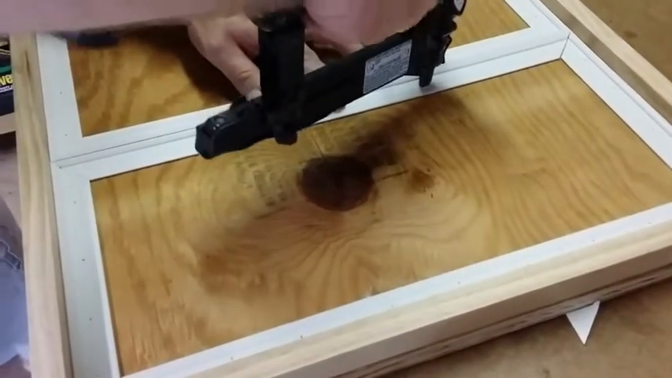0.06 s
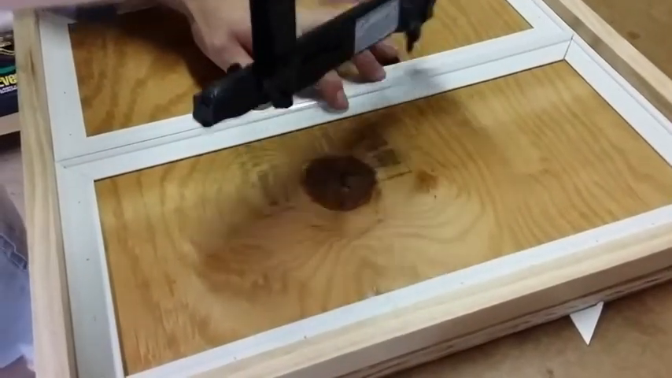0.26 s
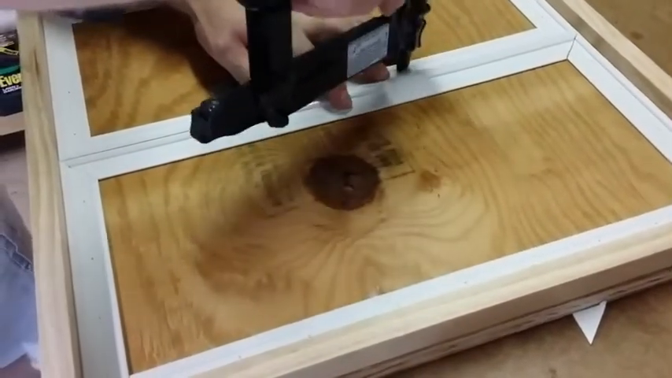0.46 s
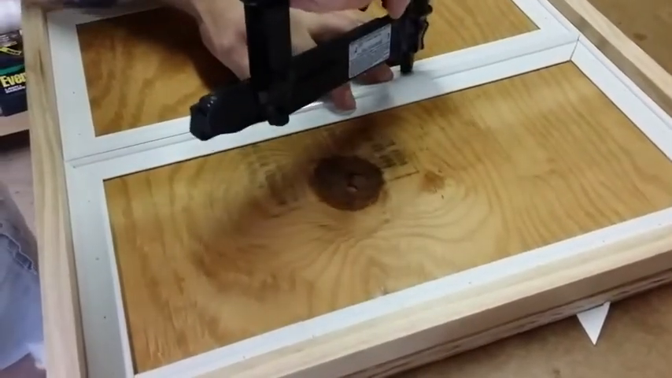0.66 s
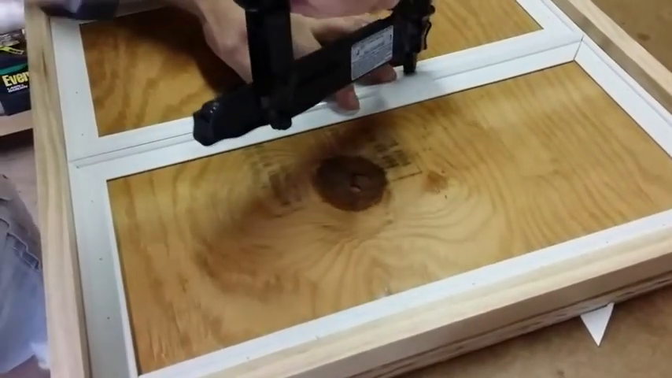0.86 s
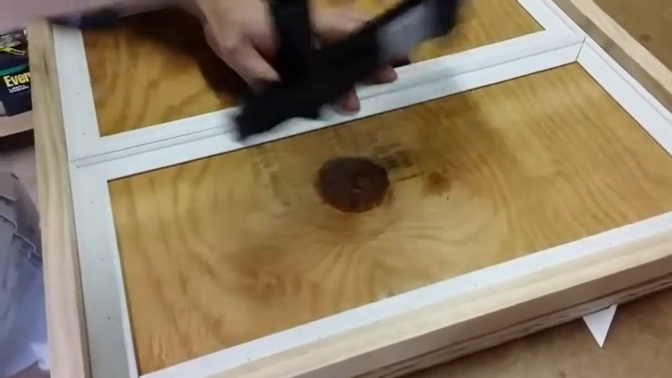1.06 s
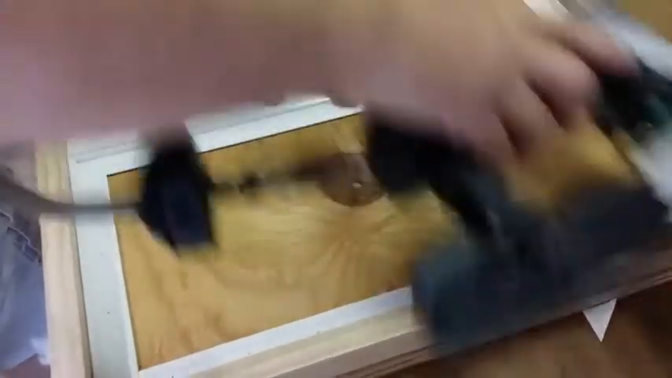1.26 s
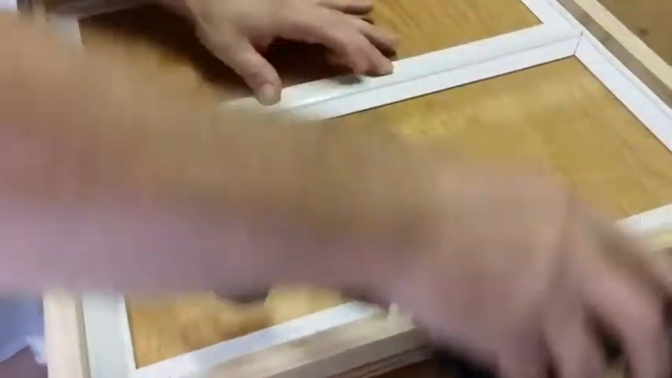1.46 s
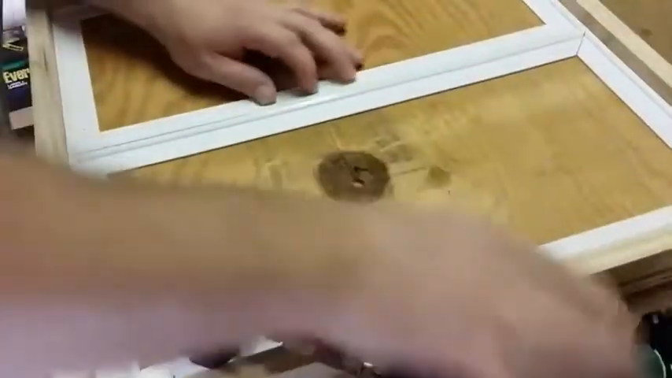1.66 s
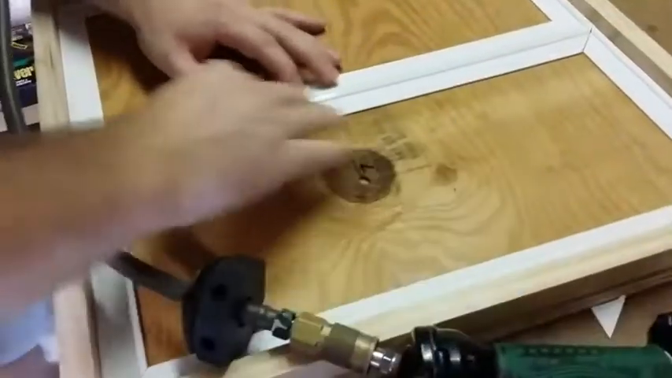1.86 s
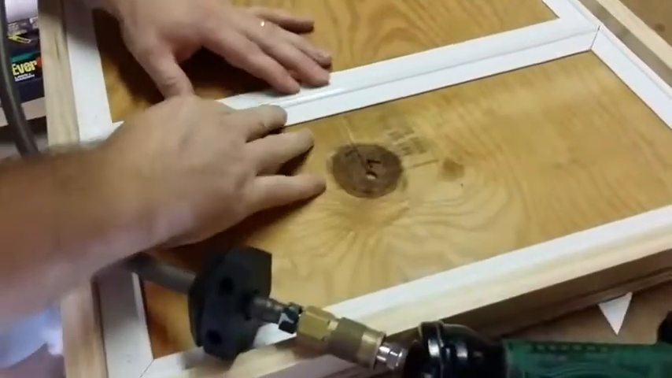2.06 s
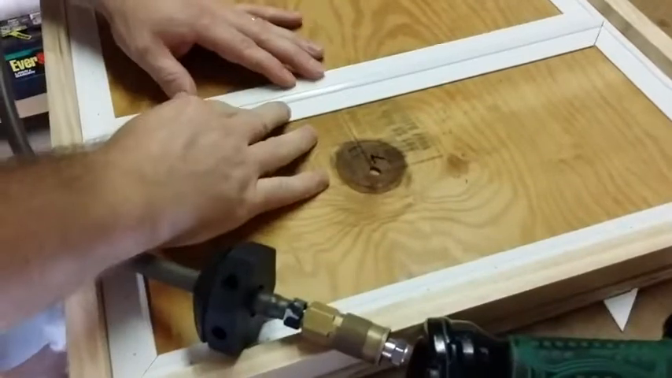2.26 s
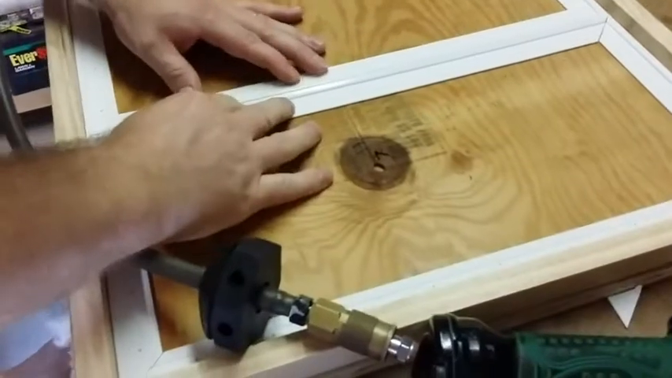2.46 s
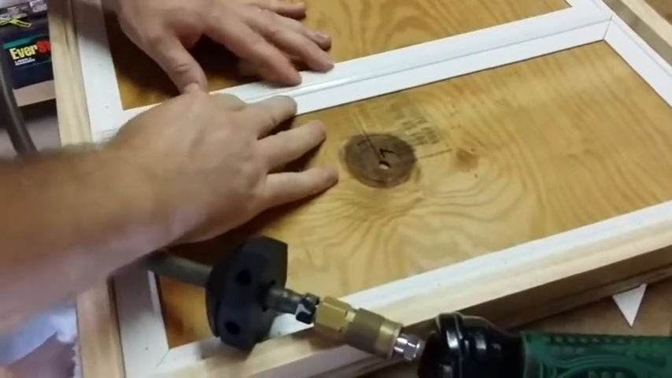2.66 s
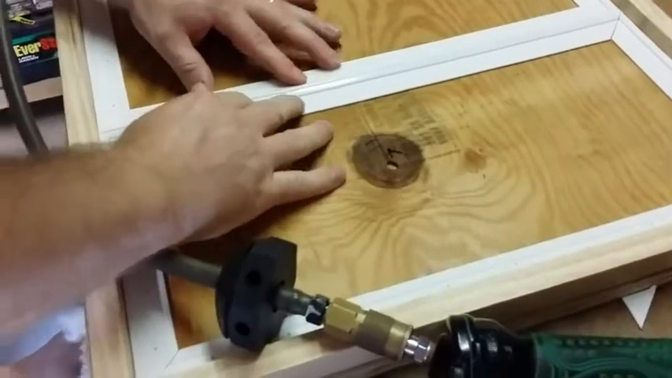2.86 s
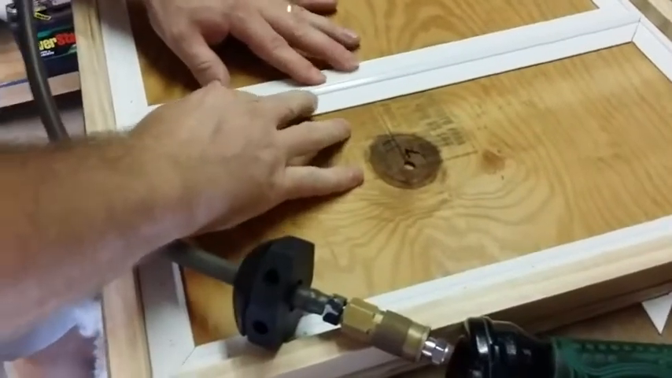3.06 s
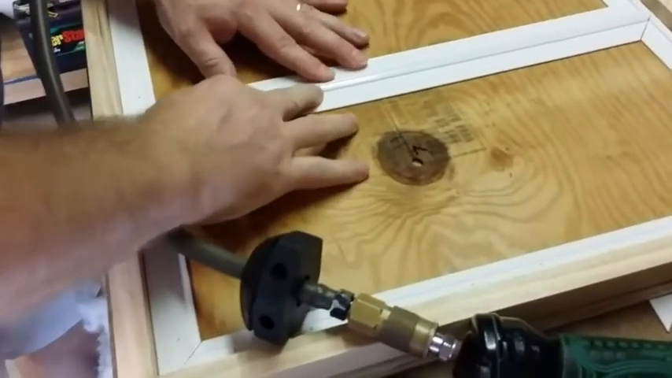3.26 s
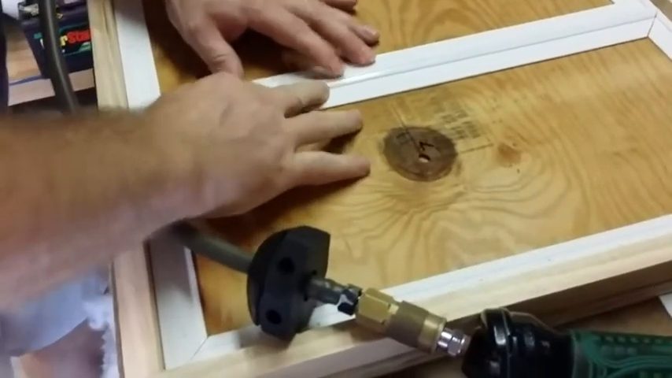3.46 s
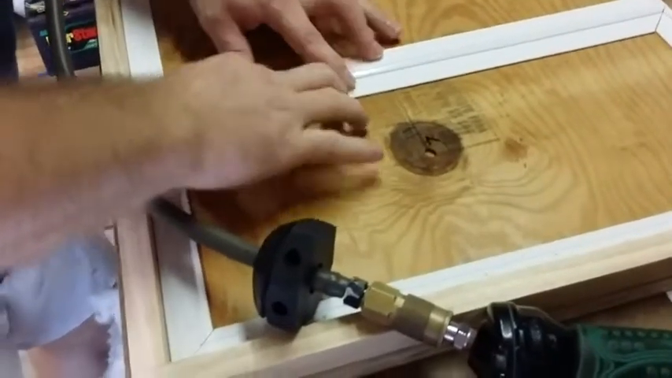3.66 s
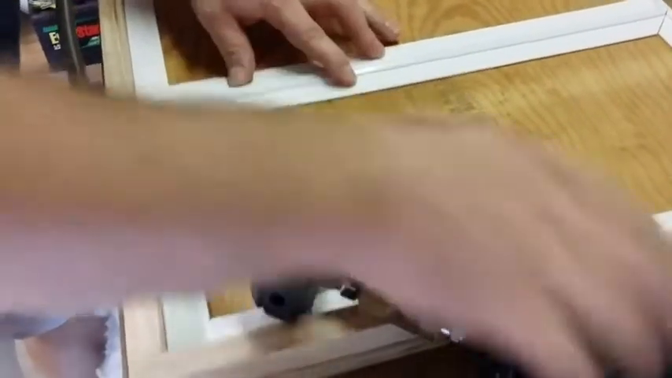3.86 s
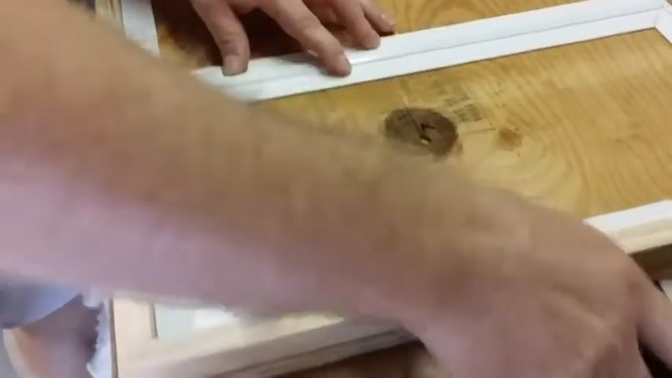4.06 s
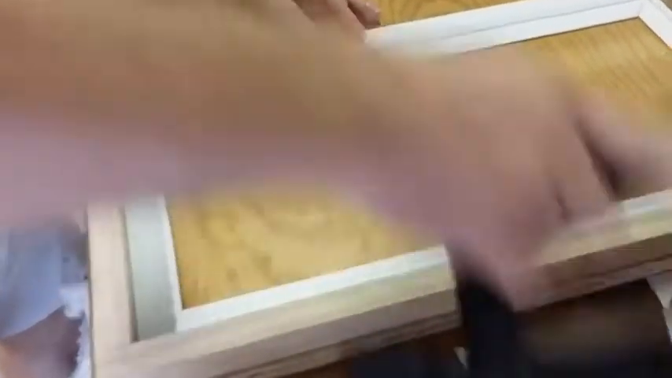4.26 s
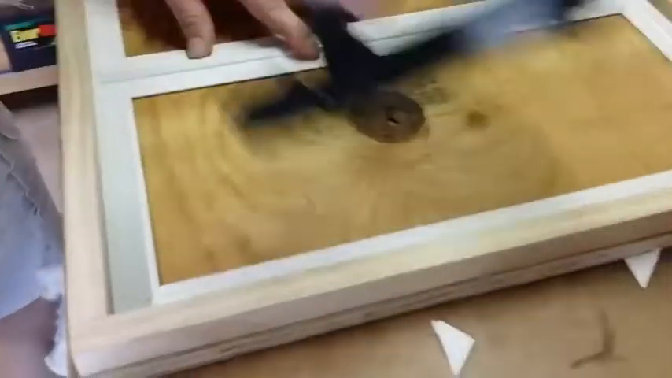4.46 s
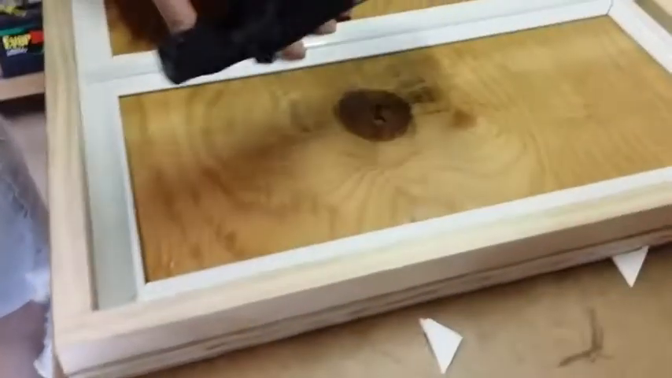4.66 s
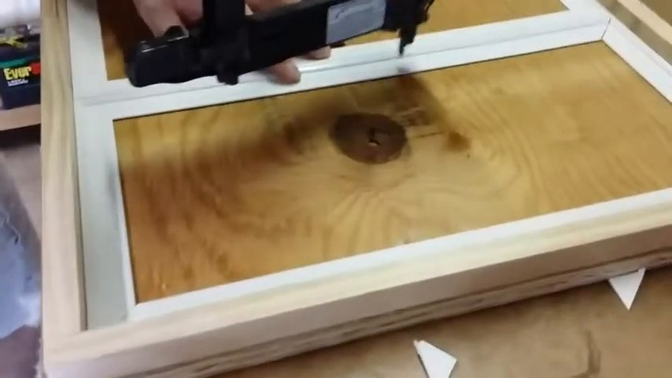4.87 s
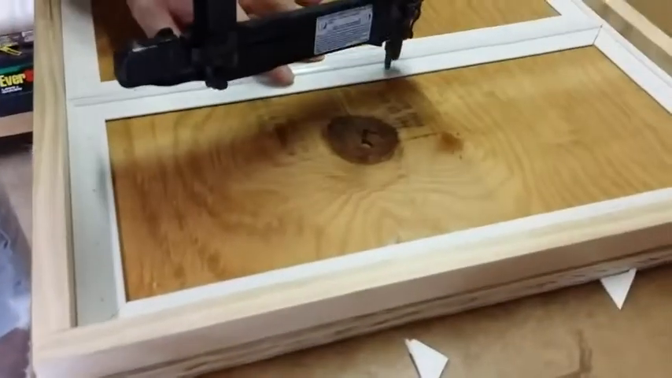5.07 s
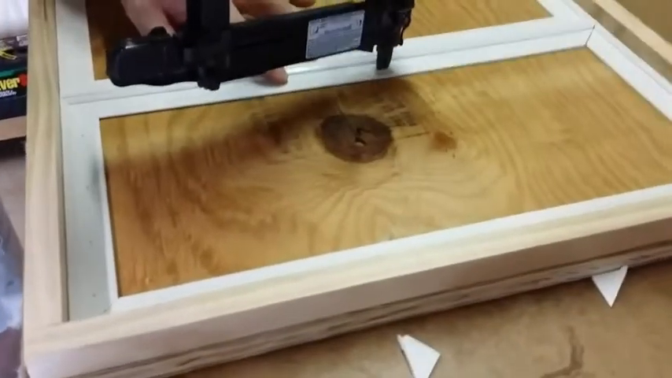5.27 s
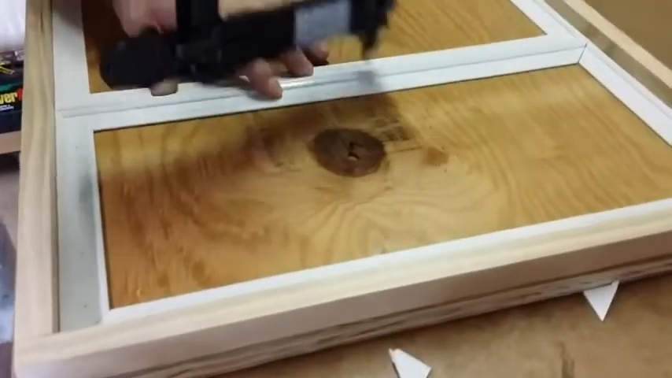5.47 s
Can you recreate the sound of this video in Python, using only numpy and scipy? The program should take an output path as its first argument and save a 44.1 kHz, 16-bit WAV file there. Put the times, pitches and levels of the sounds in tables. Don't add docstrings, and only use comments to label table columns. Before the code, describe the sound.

In a small workshop, a pneumatic stapler fires two sharp cracks into wood within the first second, each followed by a short air puff. The tool is laid down with a heavy wooden clunk and small bumps. A rapidly thumping, clattering compressor swells up behind, then metallic ticks and a nose knock precede a last, loudest shot. Close phone microphone, stereo, with automatic gain pumping.

```python
import sys
import numpy as np
from scipy import signal
from scipy.fft import rfft, irfft
from scipy.io import wavfile

SR = 44100
rng = np.random.default_rng(int(sys.argv[2]) if len(sys.argv) > 2 else 0)


def attenuation_scalar(level_db):
    decades = np.asarray(level_db, float) / 20
    return 10 ** decades


def put_to_file(sound):
    columns = np.atleast_2d(sound).T
    safe = np.clip(columns, -1, 1)
    whole_steps = np.round(safe * 32767)
    wavfile.write(sys.argv[1], SR, whole_steps.astype(np.int16))


N = 242550
SHAFT_HZ = 29.882

# start in seconds, peak in dB, left minus right in dB, bench boom in dB.
SHOTS = [
    (0.0723, -5.5, 3.5, -18),
    (0.8811, -6, 2.5, -15),
    (5.2997, -3, 4, -4.5),
]
# start in seconds, peak in dB, piston knock in dB,
# venting time in seconds, thud of the piston seating in dB.
PUFFS = [
    (0.1486, -6.5, -17.5, 0.029, -21),
    (0.9776, -5, -15.5, 0.027, -14),
    (5.384, -5.5, -18.5, 0.02, -14),
]
# frequency in Hz, likeness (1 = the same).
NEAR = [(60, 0.88), (130, 1), (290, 0.52), (640, 0.61), (1410, -0.046), (3100, 0.3), (6820, -0.094),
        (15000, -0.03)]


def along(hz, table):
    f, v = np.transpose(table)
    return np.interp(np.log(np.maximum(hz, 1)), np.log(f), v)


def colour(x, table):
    c = irfft(along(np.fft.rfftfreq(4096, 1 / SR), table) * np.log(10) / 20)
    c[1:2048] *= 2
    c[2049:] = 0
    h = irfft(np.exp(rfft(c)))[:2048]
    h = h / np.sqrt(np.sum(h ** 2))
    h = h.reshape((1,) * (x.ndim - 1) + (-1,))
    return signal.fftconvolve(x, h, axes=-1)[..., :x.shape[-1]]


def level(x, db):
    return x * attenuation_scalar(db) / np.sqrt(np.mean(x ** 2))


def pair(a, b, table):
    alike = np.clip(along(np.fft.rfftfreq(len(a), 1 / SR), table), 0, 1)
    mid = rfft(a) * np.sqrt((1 + alike) / 2)
    side = rfft(b) * np.sqrt((1 - alike) / 2)
    return irfft(np.array([mid + side, mid - side]), len(a))


def shape(s, rise, hold, t60):
    out, start = np.zeros(N), int(s * SR)
    t = np.arange(min(N - start, int((hold + 1.5 * t60) * SR))) / SR
    fall = attenuation_scalar(-60 * np.maximum(t - hold, 0) / t60)
    out[start:start + len(t)] = np.clip(t / max(rise, 1e-4), 0, 1) * fall
    return out


def gun():
    # frequency in Hz, level in dB per Hz.
    crack_colour = [(88, -22), (150, -12), (339, -5.5), (752, -7.5), (896, -5), (1050, -2), (1540, -4.5),
                    (2150, -1), (3050, -5), (3360, -9), (5560, -11.5), (6130, -10), (15600, -29)]
    air_colour = [(180, -35), (300, -4), (501, -19), (553, -17), (795, -14), (1790, -36), (2330, -4.5),
                  (3890, -7), (6710, 0.5), (13900, 1), (15600, -1.5)]
    piston_colour = [(88, -41), (150, -4.5), (1160, -1), (1510, -3.5), (1800, -3), (2160, -9), (2470, -2),
                     (3730, -10), (4000, -6.5), (5200, -14.5), (8800, -120)]
    crack, air, piston = np.zeros((3, 2, N))
    crack_noise, air_noise, piston_noise = [pair(*rng.standard_normal((2, N)), NEAR) for _ in range(3)]
    for s, db, pan_db, _ in SHOTS:
        lean = attenuation_scalar(db + np.array([[pan_db], [-pan_db]]) / 2)
        crack += lean * crack_noise * attenuation_scalar(-7) * shape(s, 0.00011, 0.013, 0.17)
        crack[:, int(s * SR)] += attenuation_scalar(5) * lean[:, 0]
        air += attenuation_scalar(db - 45) * air_noise * shape(s - 0.005, 0.001, 0.0036, 0.02)
        air += attenuation_scalar(db - 13.8) * air_noise * shape(s, 0.0024, 0.019, 0.24)
    for s, db, knock_db, vent_s, _ in PUFFS:
        air += attenuation_scalar(db - 8.5) * air_noise * shape(s, 0.001, vent_s, 0.3)
        piston += attenuation_scalar(knock_db) * piston_noise * shape(s, 0.0003, 0.021, 0.034)
        piston[:, int(s * SR)] += attenuation_scalar(knock_db + 23)
    vent_side = attenuation_scalar(np.array([[-1.2], [1.2]]))
    dip = signal.iirnotch(3800, 9, SR)
    air = signal.lfilter(*dip, signal.lfilter(*dip, air))
    loud = colour(crack, crack_colour) + vent_side * colour(air, air_colour)
    return loud, colour(piston, piston_colour)


def blows():
    # start in seconds, low level in dB, clack in dB,
    # brightness in dB per octave.
    knocks = [(0.351, -47, -32.5, 8), (.452, -34.5, -56, -14), (.648, -29.5, -44.5, 0.5),
              (1.5799, -10, -10, 2.5), (1.603, -17.5, -28, -8), (1.633, -42, -30, -14),
              (1.666, -32, -50, -10), (1.728, -25, -37, 2.5), (1.74, -25, -55, -5.5),
              (1.789, -41, -46, -2.5), (1.816, -36, -68, -8), (1.899, -35, -52, 7), (1.912, -33, -51, -18),
              (2.004, -33, -63, -9)]
    ring_t60_s, boom_t60_s = 0.1, 0.07
    no_clack_db = -90
    rows = [(s, db, clack_db, ring_t60_s, tilt_db) for s, db, clack_db, tilt_db in knocks]
    for k in range(3):
        rows.append((5.153 + k * 0.0122, -4 - k * 5.2, -30 - k * 9, 0.095, -2.2))
    for s, _, _, boom_db in SHOTS:
        rows.append((s - 0.00094, boom_db, no_clack_db, boom_t60_s, -5.5))
    for s, _, knock_db, _, seat_db in PUFFS:
        rows.append((s, knock_db + 2.5, no_clack_db, boom_t60_s, -1.2))
        rows.append((s + 0.029, seat_db, no_clack_db, boom_t60_s, -5.5))
    return rows


def handling():
    # frequency in Hz, level in dB, share of the ring time.
    bench_modes = [(91, -14, 1.5), (112.5, -9, 1.1), (142.2, -3, 1.27), (198, 2.5, 0.69),
                   (256.6, 6.5, 0.34), (326, -0.5, 0.65), (434, -8.5, 0.68), (565, -10.5, 0.6),
                   (1014, -16, 2), (1265, -19, 0.63), (1760, -16, 0.36)]
    # frequency in Hz, level in dB per Hz.
    clack_colour = [(240, -29), (400, -4), (874, -1.5), (1430, -8), (1770, -2.5), (2060, -7), (4370, -12),
                    (6030, -11.5), (15600, -23.5)]
    # start in seconds, magazine level in dB, spring level in dB,
    # spring frequency in Hz, length in seconds.
    rattles = [(0.033, -30, -30, 11000, .0015), (0.367, -45, -50, 6000, .012),
               (1.425, -42, -45, 4500, .006), (4.139, -30, -17.5, 5150, .012),
               (4.151, -32, -18, 10000, 0.0033), (4.383, -10.5, -12.5, 6700, .002),
               (4.481, -36, -23, 12000, .002), (4.9545, -7, -13, 5500, .006),
               (4.967, -19, -11, 5500, 0.0047), (5.1518, -11, -24, 12000, 0.0016),
               (5.2597, -26, -13, 8000, .001), (4.383, -45, -17, 15400, .008),
               (4.957, -40, -16.5, 14000, .01)]
    magazine_hz, spring_width_hz = 2720, 6000
    out, clack = np.zeros((2, 2, N))
    t = np.arange(SR // 3) / SR
    hz, mode_db, share = np.transpose(bench_modes)[:, :, None]
    noise = pair(*rng.standard_normal((2, N)), NEAR)
    rows = blows()
    chance = rng.standard_normal((len(rows), 3, len(bench_modes), 1))
    for (s, db, clack_db, t60, tilt_db), (size, tune, lag) in zip(rows, chance):
        start_db = mode_db + tilt_db * np.log2(hz / 200) + 1.5 * size
        fade = attenuation_scalar(start_db - 60 * t / (t60 * share))
        phase = 2 * np.pi * hz * (1 + 0.0345 * tune) * t
        ring = np.array([np.sum(fade * np.sin(phase + side * 0.5 * lag), axis=0) for side in (1, -1)])
        start = int(s * SR)
        ring = (ring * np.clip(t / 0.0019, 0, 1))[:, :N - start]
        out[:, start:start + ring.shape[1]] += attenuation_scalar(db) * ring / np.abs(ring).max()
        clack += attenuation_scalar(clack_db - 2.5) * noise * shape(s + 0.0021, 0.00028, 0.0045, 0.055)
    grit = noise * attenuation_scalar(3.72 * rng.standard_exponential(N))
    for s, magazine_db, spring_db, spring_hz, length in rattles:
        tick = grit * shape(s, 0.00016, length, 0.031)
        span = slice(int(s * SR), int((s + 0.1) * SR))
        parts = ((magazine_db, magazine_hz, 1.1), (spring_db, spring_hz, spring_hz / spring_width_hz))
        for db, centre_hz, sharp in parts:
            body = signal.iirpeak(min(centre_hz, 15500), sharp, SR)
            rung = signal.lfilter(*body, signal.lfilter(*body, tick[:, span]))
            out[:, span] += attenuation_scalar(db - 10.5) * rung
    return out + colour(clack, clack_colour)


def room(direct, wet_db):
    # frequency in Hz, time to fall 60 dB in seconds.
    room_t60 = [(60, 0.41), (500, 0.34), (1500, 0.36), (4000, 0.48), (9000, 0.39), (16000, .3)]
    t = np.arange(SR // 2) / SR
    tail = 0
    for hz in 62.5 * 2. ** np.arange(8.):
        sos = signal.butter(2, [hz / 2 ** .5, hz * 2 ** .5], "bandpass", fs=SR, output="sos")
        band = signal.sosfilt(sos, rng.standard_normal((2, len(t))))
        tail = tail + band * attenuation_scalar(-60 * t / along(hz, room_t60))
    tail = pair(*tail, NEAR) * np.clip(t / 0.0027, 0, 1)
    tail = tail / np.sqrt(np.mean(np.sum(tail ** 2, axis=1)))
    echoes = signal.fftconvolve(direct.mean(axis=0)[None], tail, axes=1)[:, :N]
    return direct + attenuation_scalar(wet_db) * echoes


def compressor():
    # frequency in Hz, level in dB per Hz.
    clatter_colour = [(680, -36), (1150, 1), (1510, -2.5), (1570, -6.5), (1830, -3), (2170, -3.5),
                      (2720, 0), (3340, -11), (3580, -7.5), (3970, -6), (6950, -7.5), (9000, -16.5),
                      (11700, -38), (19800, -120)]
    hiss_colour = [(24, -21), (40, -16), (71, -4.5), (106, -14.5), (267, -1), (462, -16.5), (742, -16),
                   (1000, -13.5), (1570, -16), (2720, -17.5), (3320, -21.5), (7190, -13), (15600, -22)]
    # frequency in Hz, width in Hz, level in dB.
    casing = [(1861, 19, 8), (2735, 37, -6), (3560, 71, -6), (6370, 300, -11), (6900, 160, -0.5),
              (8000, 290, -2.5)]
    # frequency in Hz, likeness (1 = the same).
    far_likeness = [(60, 0.82), (130, 0.95), (290, 0.51), (640, 0.12), (1410, -0.29), (3100, 0.25),
                    (6820, -0.14), (15000, 0.16)]
    thump_turn = 0.932
    turn = SHAFT_HZ * np.arange(N) / SR
    size = 1476
    k, db = orders()
    scatter = np.clip((k - 9) / 5, 0, 1) * rng.uniform(-np.pi, np.pi, len(k))
    trio = np.isin(k, (29, 31, 32, 34, 35, 37))
    scatter[trio] = np.pi + 2 * np.pi * k[trio] * (thump_turn - 0.085)
    scatter[k == 34] += 1.05
    apart = 0.045 * k * np.array([[0.5], [-0.5]])
    lines = np.zeros((2, size // 2 + 1), complex)
    lines[:, k.astype(int)] = -attenuation_scalar(db) * np.exp(1j * (scatter + apart - 2 * np.pi * k * thump_turn))
    place = np.arange(size) / size
    hum = np.array([np.interp(turn % 1, place, w, period=1) for w in irfft(lines)])

    turns = int(turn[-1]) + 40
    kept = 0.8
    rows = signal.lfilter([1], [1, -kept], rng.standard_normal((2, turns, size)), axis=1)[:, 38:]
    now = np.round(turn * size).astype(int)
    raw = pair(*[r.ravel()[now] for r in rows], far_likeness)
    clatter = level(colour(raw, clatter_colour), 0)
    for hz, width, peak_db in casing:
        ring = signal.lfilter(*signal.iirpeak(hz, hz / width, SR), clatter)
        clatter = clatter + attenuation_scalar(peak_db + 0.5) * ring

    hiss = colour(pair(*rng.standard_normal((2, N)), far_likeness), hiss_colour)
    left_db = 1.6
    lean = attenuation_scalar(np.array([[left_db], [-left_db]]) / 2)
    return lean * (level(hum, -33) + level(clatter, -36.5) + level(hiss, -36.5) + valves(turn))


def orders():
    # multiple of the shaft rate, level in dB.
    main_orders = np.transpose([(2, 0), (3, -22.5), (4, -12), (5, -8), (6, -8), (7, -3.5), (8, -7),
                                (9, 0.5), (10, -10.5), (11, -8), (12, -9.5), (13, -9.5), (14, -14),
                                (22, -11.5), (28, -16), (29, -15), (31, -4), (32, -10), (34, -3), (35, -16),
                                (37, -6.5)])
    k = np.setdiff1d(np.arange(16, 31), main_orders[0])
    db = -18.5 + 0.25 * (k - k[0]) + 2.1 * rng.standard_normal(len(k))
    return np.hstack([main_orders, [k, db]])


def valves(turn):
    # place in the turn, frequency in Hz, time to fall 60 dB in seconds, level in dB.
    reeds = [(0.28, 2720, 0.028, -46.5), (0.21, 1866, 0.02, -49), (0.9, 5770, 0.0053, -54.5)]
    out = np.zeros((2, N))
    for place, hz, t60, db in reeds:
        count = np.floor(turn - place).astype(int) + 1
        since = (turn - place) % 1 / SHAFT_HZ
        size, tune = rng.standard_normal((count[-1] + 1, 2))[count].T
        phase = 2 * np.pi * hz * (1 + 0.0088 * tune) * since
        fade = attenuation_scalar(1.3 * size - 60 * since / t60) * np.clip(since / 0.00041, 0, 1)
        out += level(fade * np.sin(phase + np.array([[0], [np.pi / 2]])), db)
    return out


def gain_control(t):
    # start in seconds, held gain in dB.
    pulls = [
        (-0.75, -17),
        (0.0269, -16.5),
        (0.89, -17.5),
        (1.5771, -17),
        (5.298, -15.5),
    ]
    open_db, grab_s, recover_after_s, recover_s = 1, 0.0064, 1.027, 0.098
    s, held_db = np.transpose(pulls)
    last = np.searchsorted(s, t) - 1
    closed = 1 / (1 + np.exp((t - s[last] - recover_after_s) / recover_s))
    goal = open_db + (held_db[last] - open_db) * closed
    stay = np.exp(-1 / (grab_s * SR))
    return goal[0] + signal.lfilter([1 - stay], [1, -stay], goal - goal[0])


def scene():
    t = np.arange(N) / SR
    gain_db = gain_control(t)
    loud, piston = gun()
    bench = room(loud, -6.0) * attenuation_scalar(gain_db + 18) + room(piston + handling(), -11.5)
    bench = signal.sosfilt(signal.butter(2, 75, "highpass", fs=SR, output="sos"), bench)
    duck_db, duck_s = 0, 0.008
    for s, *_ in PUFFS:
        duck_db = duck_db - 8 * np.clip(1 - (s - t) / duck_s, 0, 1) * (t < s)
    return (compressor() * attenuation_scalar(gain_db) + bench) * attenuation_scalar(duck_db)


def low_pass(x):
    return signal.sosfilt(signal.butter(12, 15730, fs=SR, output="sos"), x)


def record(dry):
    top = signal.ellip(8, 0.3, 60, 15750, fs=SR, output="sos")
    mix = np.clip(signal.sosfilt(top, dry), -0.97, 0.97)
    return low_pass(mix)


dry = scene()
out = record(dry)
put_to_file(out)
```